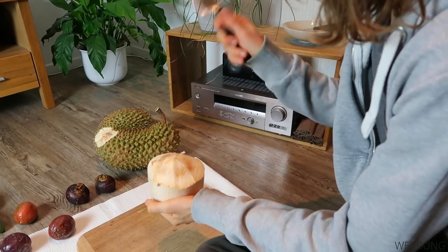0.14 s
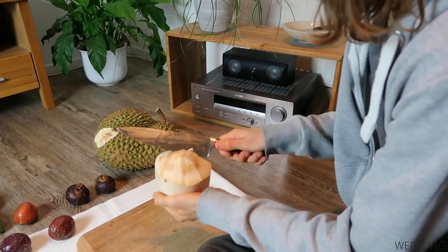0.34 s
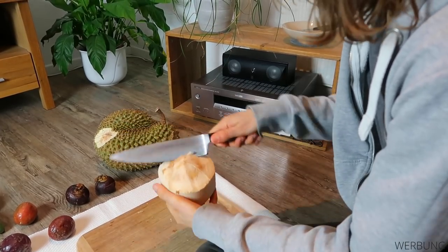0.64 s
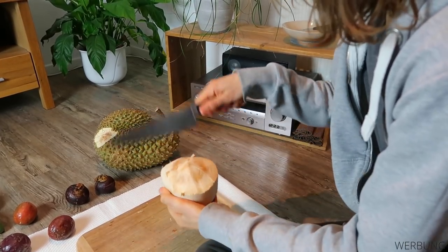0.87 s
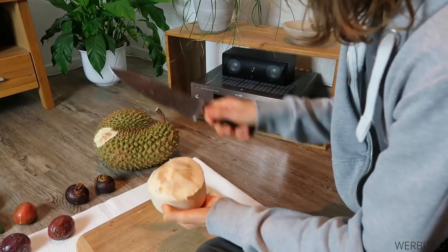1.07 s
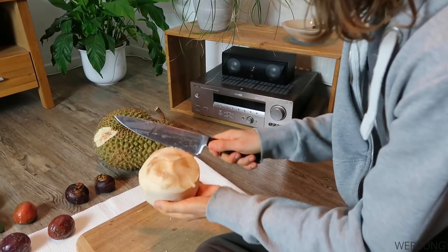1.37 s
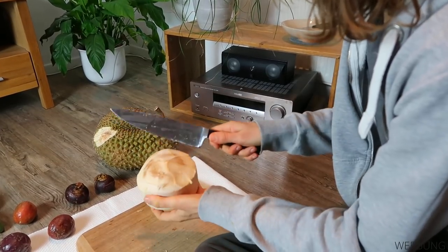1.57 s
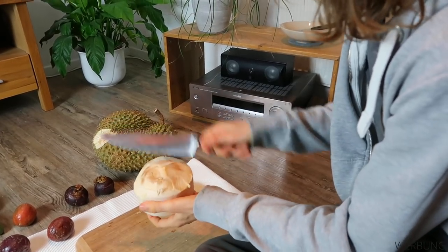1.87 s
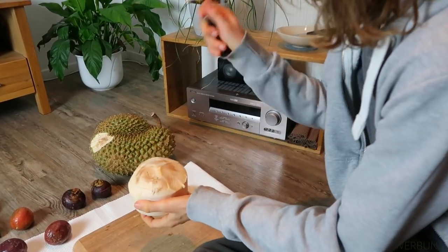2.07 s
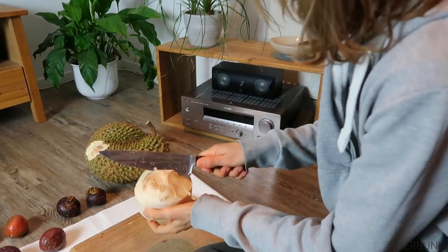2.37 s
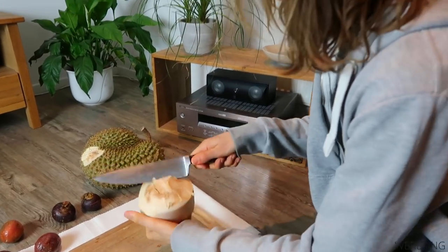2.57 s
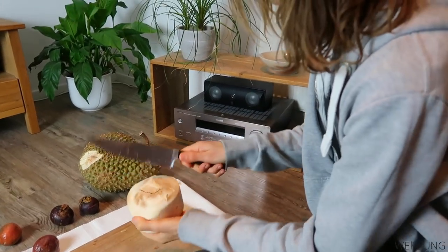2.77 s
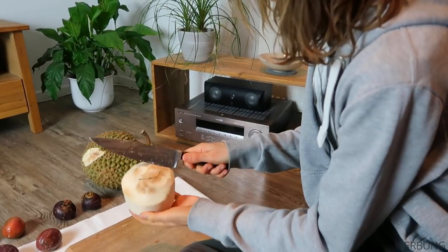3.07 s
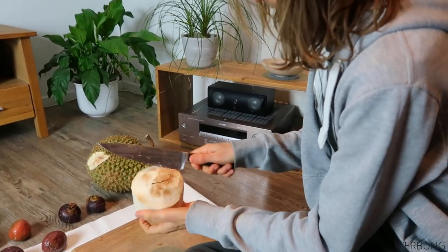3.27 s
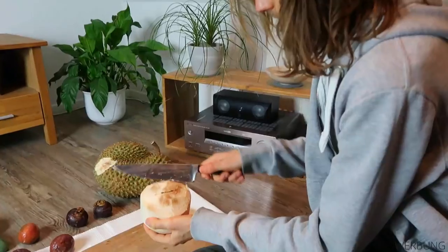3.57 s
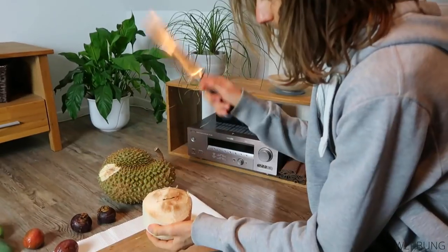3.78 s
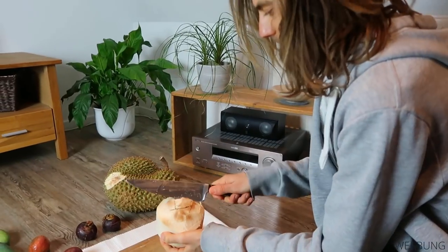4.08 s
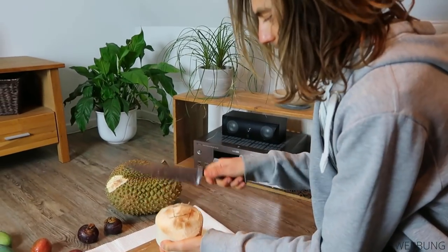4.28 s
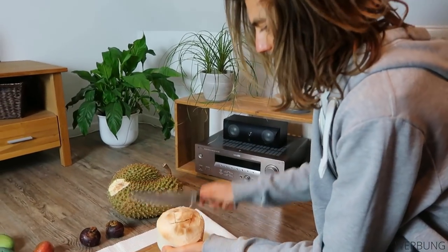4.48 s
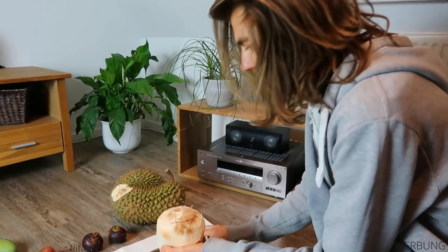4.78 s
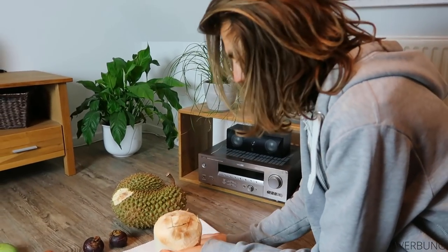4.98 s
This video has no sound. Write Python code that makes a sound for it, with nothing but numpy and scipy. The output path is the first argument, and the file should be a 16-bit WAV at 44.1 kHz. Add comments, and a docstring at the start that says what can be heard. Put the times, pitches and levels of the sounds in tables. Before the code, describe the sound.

A large knife chops a hand-held young coconut over a wooden board in a live living room. An aiming tap, then a loud crack; taps and a faint scrape, a second heavier crack with a thump; more taps and scrapes, a third crack, then two soft bumps and sleeve rustle. Close stereo microphones overload on the blows, over very faint hiss and hum.

```python
"""A large kitchen knife is used on a young coconut held on a cutting board, in a live room.
First the blade taps the husk to take aim, the nut bumps the board, and the first blow cracks the shell.
Between the three blows the blade taps, tings and scrapes, and sleeves rustle over faint hiss and hum.
Each blow is bursts of snaps ringing husk and shell, with decaying notes and a thump; it overloads the input.
After the last one come two soft bumps and the rustle of an arm reaching down."""
import sys
import numpy as np
from scipy import signal
from scipy.fft import rfft, irfft, next_fast_len
from scipy.io import wavfile

SR = 44100
rng = np.random.default_rng(int(sys.argv[2]) if len(sys.argv) > 2 else 0)


def transcribe(signal):
    """Save signal, clipped to [-1, 1], as a 16-bit WAV file at the path in sys.argv[1]."""
    frames = np.atleast_2d(signal).T
    limited = np.clip(frames, -1, 1)
    pcm = np.round(limited * 32767).astype(np.int16)
    wavfile.write(sys.argv[1], SR, pcm)


N = 226453

# full blows of the knife: crack t/s, crack level/dB, thump level/dB, brightness tilt/(dB per octave),
# sleeve rustle level of the swing/dB
BLOWS = [(0.5044, 20, -7, 1.37, -61), (2.4796, 19, 2.5, 0.57, -56), (4.1884, 22.5, -5, -0.5, -57)]
IR_SAMPLES = 4096  # length of snap bursts and impulse responses
HZ = np.fft.rfftfreq(IR_SAMPLES, 1 / SR)


def amp(db):
    """Decibels to gain."""
    return 10 ** (np.asarray(db) / 20)


def unit(x):
    """Scales to energy 1."""
    return x / (np.linalg.norm(x) + 1e-20)


def read(points, hz):
    """Reads a curve of (f/Hz, value) on a log-frequency axis."""
    f, value = np.transpose(points)
    return np.interp(np.log(hz + 1), np.log(f + 1), value)


def add(mix, s, sound):
    """Mixes a sound in at time s."""
    part = mix[round(s * SR):][:len(sound)]
    part += sound[:len(part)]


def shaped(x, points):
    """Filters a long sound by a spectrum in dB."""
    gain = amp(read(points, np.fft.rfftfreq(len(x), 1 / SR)))
    return irfft(rfft(x) * gain, len(x))


def noise(points):
    """Coloured noise of rms 1."""
    white = rng.standard_normal(next_fast_len(N))
    return unit(shaped(white, points)[:N]) * np.sqrt(N)


def causal(db):
    """Minimum-phase impulse response: it has this gain and rings only after the blow."""
    log_gain = np.log(amp(np.concatenate([db, db[-2:0:-1]])))
    return np.fft.ifft(np.exp(np.conj(signal.hilbert(log_gain)))).real


def resonance(hz, width, db):
    """One resonant peak, in dB over frequency."""
    return 10 * np.log10(1 + (amp(db) ** 2 - 1) / (1 + (2 * (HZ - hz) / width) ** 2))


def arm_db(t):
    """Arm movement level: it builds towards each blow and the final reach, then settles."""
    wind_up_db_per_s, settle_db_per_s = 10, 57.5
    reach_s, reach_db = 5.1, -65.5  # at last the arm reaches down to lay the knife aside
    swings = [(s, db) for s, *_, db in BLOWS] + [(reach_s, reach_db)]
    levels = []
    for s, db in swings:
        drop_db = np.maximum(wind_up_db_per_s * (s - t), settle_db_per_s * (t - s))
        levels.append(db - drop_db)
    return np.max(levels, axis=0)


def mains_hum(t, hz=100, rms_db=-83.5):
    """A steady sine at the mains hum pitch."""
    return amp(rms_db) * np.sqrt(2) * np.sin(2 * np.pi * hz * t)


def background(air_db=-73.5, flutter_db=1.1):
    """Sleeve noise swells unevenly with the arm, over steady coloured hiss and mains hum."""
    # sleeve cloth: f/Hz, level/dB
    sleeve = [(15, -46.5), (25, -11.5), (102, 0.5), (144, -7.5), (460, -12.5), (569, -16.5), (1100, -19),
              (1190, -22), (1920, -22.5), (6160, -35), (12900, -42.5), (14000, -55.5)]
    # quiet hiss: f/Hz, level/dB
    air = [(15, -37.5), (25, -10.5), (101, -7.5), (297, -12.5), (349, -9.5), (741, -21), (1140, -16),
           (1800, -27), (2560, -19.5), (6380, -27), (15500, -44.5)]
    # stereo spread of the background: f/Hz, side over mid/dB
    spread = [(30, -9), (55, -21), (110, -12.5), (190, -1.5), (300, 0.5), (1000, 3), (15000, 0)]
    t = np.arange(N) / SR
    folds = np.interp(t, np.linspace(0, t[-1], 200), rng.standard_normal(200))
    movement = amp(arm_db(t) + flutter_db * folds)
    mid, side = (movement * noise(sleeve) + amp(air_db) * noise(air) for _ in range(2))
    return np.array([mid + mains_hum(t), shaped(side, spread)])


def tail(build_s=0.0031):
    """Dense wall echoes that build up quickly, each band dying at its own speed."""
    # decay time of the room: f/Hz, t60/s
    decay = [(80, .45), (300, 0.51), (700, 0.6), (1300, 0.65), (3300, 0.55), (5500, 0.53), (8000, 0.39),
             (12000, 0.23), (16000, .16)]
    # colour of the tail, ahead of the wet level: f/Hz, level/dB
    colour = [(60, -16), (130, -10.5), (230, -3.5), (330, -7.5), (450, -7.5), (700, -11), (1400, -7.5),
              (3500, -12), (7000, -11), (11000, -12), (16000, -24.5)]
    hz, t, z = signal.stft(rng.standard_normal(SR), SR, nperseg=512)
    t60 = read(decay, hz)[:, None]
    even_energy = np.sqrt(np.log(1e6) / (t60 * SR))  # a longer decay adds no energy to its band
    z = z * amp(read(colour, hz)[:, None] - 60 * t / t60) * even_energy
    build_up = 1 - np.exp(-(np.arange(SR) / SR / build_s) ** 2)
    return signal.istft(z, SR, nperseg=512)[1][:SR] * build_up


def fracture(length):
    """A short run of tiny snaps that swells, dies and holds all frequencies evenly."""
    u = np.arange(IR_SAMPLES) / SR / length
    snaps = rng.standard_normal(IR_SAMPLES) * u * np.exp(-u * u)
    for _ in range(6):  # flatten the spectrum, then shape the swell again
        z = rfft(snaps)
        snaps = irfft(z / (abs(z) + 1e-12)) * np.tanh(2 * u) * np.exp(-(u / 2) ** 4)
    return snaps


def room(x, wet_db, tail_side_db=2, direct_side=0.4, echo_side=0.87, scatter_s=0.00065):
    """Direct sound, scattered early echoes and tail, as mid and side of a close microphone pair."""
    # early echoes from board, floor, shelves and ceiling: delay t/s, gain
    echoes = [(.003, 0.15), (.0055, .12), (.008, 0.23), (.0092, 0.18), (.0112, .14), (.021, .07)]
    # stereo spread: f/Hz, gain of the side signal/dB
    spread = [(60, -15), (250, -21.5), (700, -21), (1300, -19), (2500, -13), (4500, -6), (7000, -1),
              (10000, 4.5), (15000, 9)]
    mid, side = amp(wet_db) * tail(), amp(wet_db + tail_side_db) * tail()
    mid[0] += 1
    side[0] += direct_side
    for k, (delay, gain) in enumerate(echoes):
        echo = gain * unit(fracture(scatter_s))
        add(mid, delay, echo)
        add(side, delay, (-1) ** k * echo_side * echo)  # alternate sides
    side = signal.fftconvolve(x, side)[:N]
    # a quarter-turn of phase: the ports differ in phase, not in level
    side = signal.hilbert(side, next_fast_len(N)).imag[:N]
    return np.array([signal.fftconvolve(x, mid)[:N], shaped(side, spread)])


def nut(length, extra_db):
    """Snapping fibres ring the husk and shell."""
    # the nut's broad response to the edge: f/Hz, level/dB
    husk = [(40, -21), (150, -13), (320, -9.5), (520, -7.5), (900, -2), (1500, -2.5), (2100, -3.5),
            (2650, -6), (3400, -7), (5000, -8.5), (7500, -13.5), (11000, -16), (15500, -26)]
    # resonances of the shell: f/Hz, width/Hz, peak level/dB
    shell = [(370, 46, 0), (617, 26, -1.5), (790, 77, -1.5), (965, 58, -1), (1304, 280, 3), (1526, 34, 4),
             (2000, 90, 4), (2310, 140, 2), (2910, 80, 4), (2970, 72, 0.5), (3550, 320, 7), (4100, 48, 3.5)]
    body_db = read(husk, HZ) + sum(resonance(*mode) for mode in shell)
    return unit(signal.fftconvolve(fracture(length), causal(body_db + extra_db)))


def thump():
    """The nut is shoved down, away from the microphone, against the hand and the board beneath it."""
    # low push of nut on hand and board: f/Hz, level/dB
    push = [(20, -23.5), (50, -11.5), (100, -4.5), (160, -3.5), (260, -1), (380, 0.5), (600, -16.5),
            (1500, -45), (6000, -83.5)]
    return -unit(causal(read(push, HZ)))


def contact(db, thump_db, dull_hz, ring_hz, ring_db, crisp_hz=5000, crisp_db=6, steepness=4.3):
    """A light contact: the softer it is, the duller the knock."""
    contact_s, damping = .0038, .35  # damping: width of the ring as a share of its pitch
    softness_db = -20 * np.log10(1 + (HZ / dull_hz) ** steepness)
    fibres_db = crisp_db * HZ / (HZ + crisp_hz)
    ringing_db = resonance(ring_hz, damping * ring_hz, ring_db)
    knock = amp(db) * nut(contact_s, softness_db + fibres_db + ringing_db)
    add(knock, contact_s / 2, amp(thump_db) * thump())
    return knock


def bumps():
    """Single soft knocks as the nut shifts in the hand and bumps the board."""
    # t/s, knock level/dB, thump level/dB, dull above f/Hz, knock ring f/Hz, ring level/dB
    knocks = [(0.444, -37, -57, 2200, 1300, 2), (3.0052, -35, -32.5, 2776, 850, 15),
              (4.973, -29.5, -56, 899, 846, 14), (5.1240, -35, -49.5, 900, 848, 8)]
    out = np.zeros(N)
    for s, *knock in knocks:
        add(out, s, contact(*knock))
    return out


def scrapes(grains_per_s=2500, grain_db=0.5):
    """Husk fibres flick off the sliding edge: random grains swell and fade with its pressure."""
    # the edge dragged over the husk: start t/s, length/s, level at full pressure/dB
    drags = [(1.51, 0.39, -64.5), (3.24, 0.052, -53.5), (3.358, .15, -61.5), (3.62, 0.17, -74)]
    # colour of the flicked fibres: f/Hz, level/dB
    colour = [(300, -12), (800, -5), (1040, 2.5), (1170, 6.5), (1320, -2), (1850, -9.5), (2130, 1),
              (2500, -6.5), (4000, -6), (7000, -14.5), (12000, -23), (15500, -30)]
    flicks = rng.standard_normal(N)
    boost_db = grain_db * np.minimum(rng.exponential(1, N), 4)  # a few flicks stand out
    grains = flicks * amp(boost_db) * (rng.random(N) < grains_per_s / SR)
    pressure = np.zeros(N)
    for s, length, db in drags:
        add(pressure, s, amp(db) * np.hanning(round(length * SR)))
    return pressure * unit(shaped(grains, colour)) * np.sqrt(N)


def blade(centre_hz, spread, max_sway_hz=9, sway=0.45, rise_s=0.0052):
    """Where the blade is touched decides which steel modes speak; they waver as it swings."""
    # modes of the steel blade: f/Hz, level if fully excited/dB, t60/s
    modes = [(3006, 3.5, .3), (3871, -7, 0.17), (4500, -15.5, 0.1), (5830, -10, .2), (6215, -5.5, 0.54),
             (7070, -3.5, 0.49), (8140, -12, 0.58), (9320, -2, 0.258), (10760, -2, 0.156),
             (12460, -3.5, 0.17), (14390, -2.5, 0.13)]
    out, t = np.zeros(SR), np.arange(SR) / SR
    for hz, db, t60 in modes:
        reach = 1 / (1 + (np.log2(hz / centre_hz) / spread) ** 2)
        sway_hz = max_sway_hz * rng.uniform(0.62, 1.0)
        waver = 1 + sway * np.sin(2 * np.pi * sway_hz * t)
        out += reach * waver * amp(db - 60 * t / t60) * np.sin(2 * np.pi * hz * t)
    return out * (1 - np.exp(-t / rise_s))


def aiming(rebound_s=.0113, rebounds=2):
    """The blade lands on the husk to take aim, rebounds ever more weakly and tings."""
    # t/s, knock level/dB, thump level/dB, dull above f/Hz, knock ring f/Hz, ring level/dB,
    # level change at each rebound/dB, steel ting level/dB, ting centre f/Hz, ting spread/octaves
    landings = [(0.0199, -11.5, -18, 1950, 378, 14.5, -1.5, -58.5, 4120, 1.6),
                (1.075, -32, -54, 2600, 1212, 8, -3, -60.5, 4300, .6),
                (1.5110, -37, -42.5, 9000, 3016, 2, -9, -59, 6090, .14),
                (1.9534, -12, -13.5, 7000, 452.5, 15.5, -5.5, -51.5, 11080, 0.12),
                (2.9660, -34.5, -37, 6000, 3370, 8, -3.5, -54.5, 6960, 0.19),
                (3.2460, -22, -30, 16000, 4390, 18, -9, -51.5, 13500, 0.77)]
    out = np.zeros(N)
    for s, *knock, rebound_db, ting_db, centre_hz, spread in landings:
        for k in range(rebounds + 1):
            add(out, s + k * rebound_s, amp(k * rebound_db) * contact(*knock))
        add(out, s, amp(ting_db) * blade(centre_hz, spread))
    return out


def struck(hz, t60, rise_s=0.0012):
    """One decaying note of the shell; it swells while the edge drives in."""
    t = np.arange(IR_SAMPLES) / SR
    swell = 1 - np.exp(-(t / rise_s) ** 2)
    return unit(swell * amp(-60 * t / t60) * np.sin(2 * np.pi * hz * t))


def chops(t60_at_1khz=0.0099, t60_slope=0.21, wet_db=1.68):
    """Full blows: edge bites, shell cracks and rings, nut thumps; moved between blows, it echoes anew."""
    # each blow frees a different piece of shell; one list of its notes per blow: f/Hz, level/dB
    pieces = [
        [(486, 1), (1120, 13), (1290, 14), (2204, 8.5), (3200, 11), (3580, 5)],
        [(290, 5), (1420, 10), (1560, 10.5), (1940, 12.5), (3080, 11), (3480, 10.5)],
        [(896, 7), (1263, 11.5), (1750, 2.5), (2218, 15.5), (3520, 8), (4230, 6.5)],
    ]
    bite_s, bite_db = 0.0063, -21  # soft husk is sliced ahead of the shell, this far below the crack
    crack_s, shove_s = .0026, 0.0027  # the thump follows the crack by shove_s
    out = np.zeros((2, N))
    for (s, db, thump_db, tilt, _), notes in zip(BLOWS, pieces):
        blow = np.zeros(N)
        colour_db = tilt * np.log2(HZ / 1200 + .1)
        add(blow, s - bite_s, amp(db + bite_db) * nut(bite_s, colour_db))
        add(blow, s, amp(db) * nut(crack_s, colour_db))
        add(blow, s + shove_s, amp(thump_db) * thump())
        for k, (hz, ring_db) in enumerate(notes):
            t60 = t60_at_1khz * (1000 / hz) ** t60_slope
            direction = (-1) ** k  # neighbouring modes start in opposite directions
            add(blow, s + crack_s / 2, direction * amp(ring_db) * struck(hz, t60))
        out += room(blow, wet_db)
    return out


def scene():
    """The nut and knife in the room, over the background, as left and right."""
    blows = chops()
    handling = room(aiming() + bumps() + scrapes(), wet_db=7.5)
    mid, side = blows + handling + background()
    return np.array([mid + side, mid - side])


def record(dry, low_cut_hz=55, edge_hz=15750):
    """The blows overload the input and their tops are flattened; then the band limits."""
    clipped = dry / (1 + (dry / .97) ** 8) ** (1 / 8)
    low_cut = signal.butter(1, low_cut_hz, "high", fs=SR, output="sos")
    clipped = signal.sosfilt(low_cut, clipped)
    high_cut = signal.firwin(511, edge_hz, window=("kaiser", 8), fs=SR)
    return signal.oaconvolve(clipped, high_cut[None], "same")


dry = scene()
out = record(dry)
transcribe(out)
```